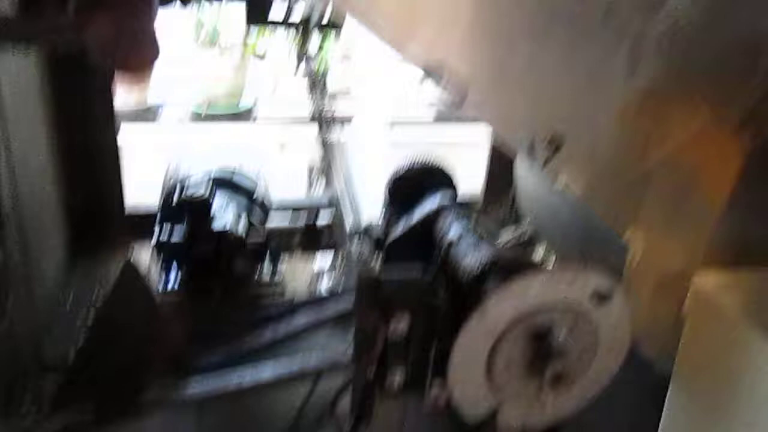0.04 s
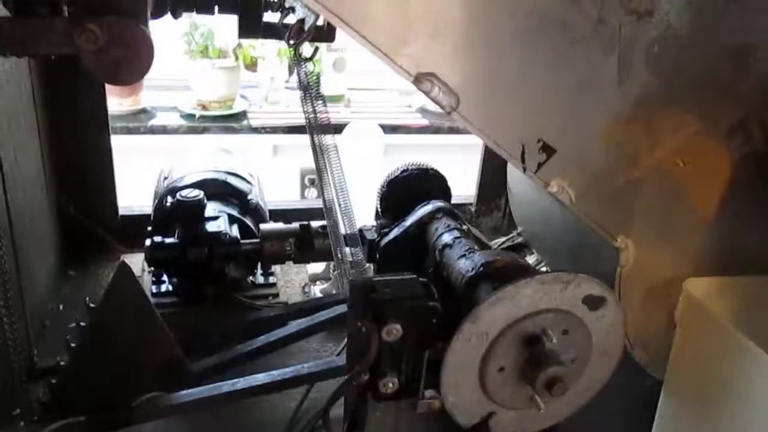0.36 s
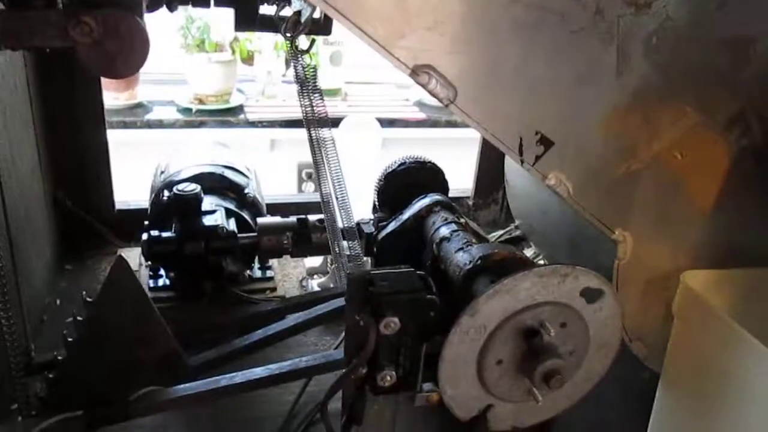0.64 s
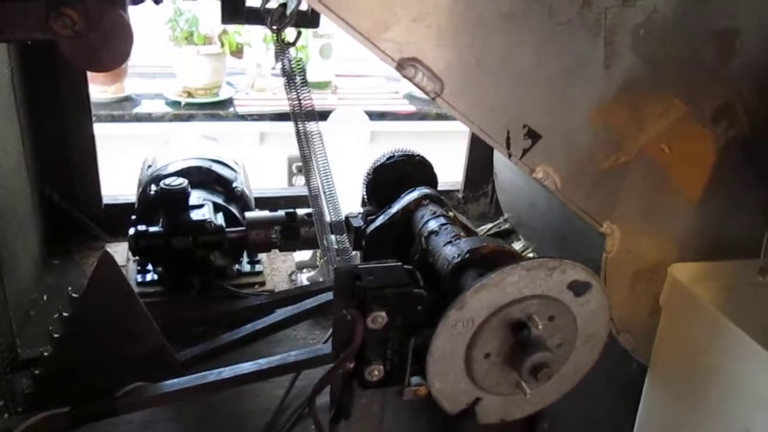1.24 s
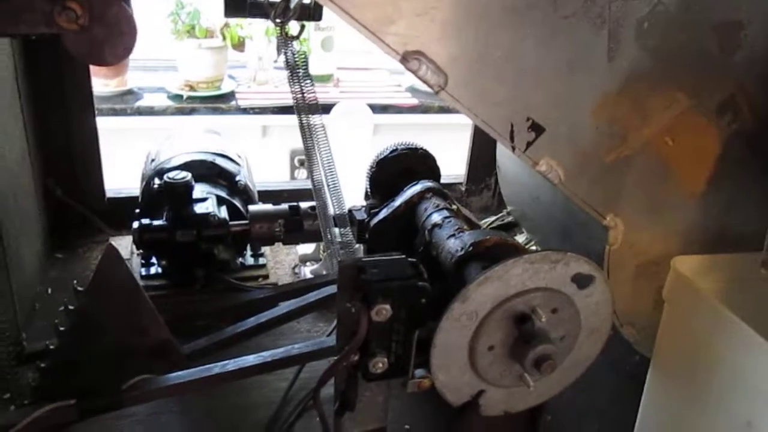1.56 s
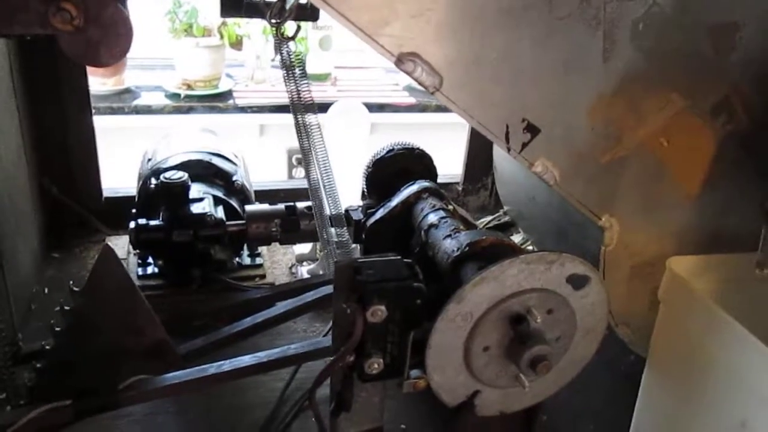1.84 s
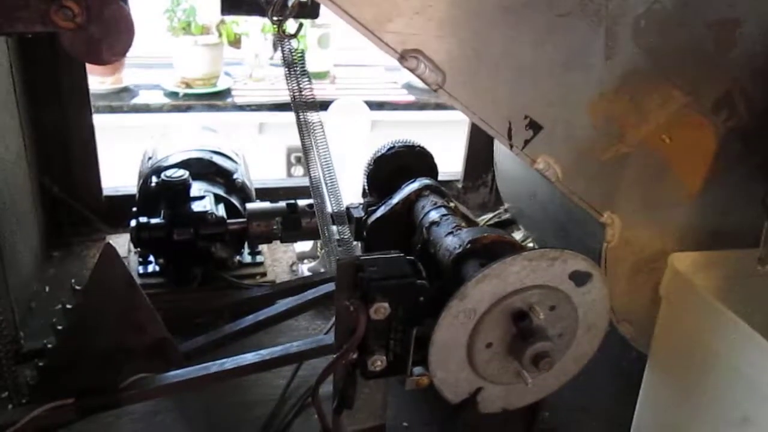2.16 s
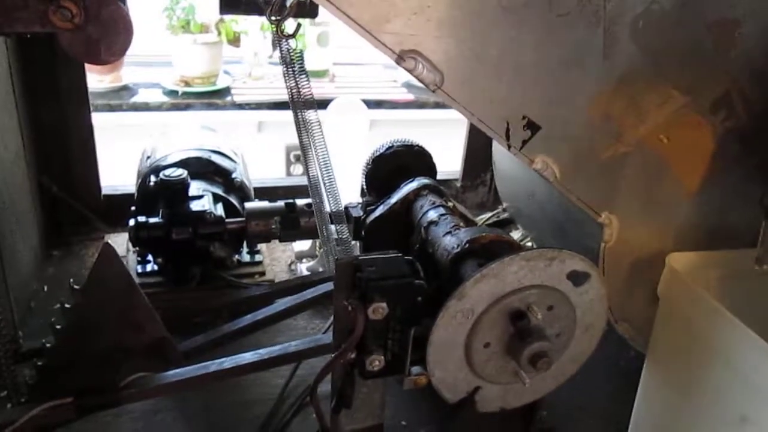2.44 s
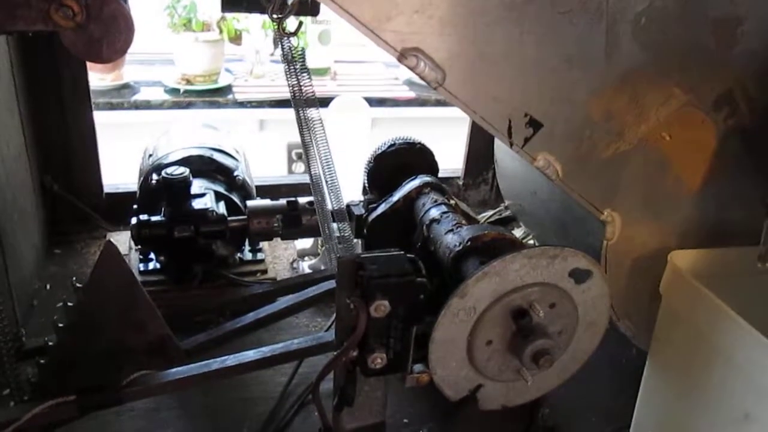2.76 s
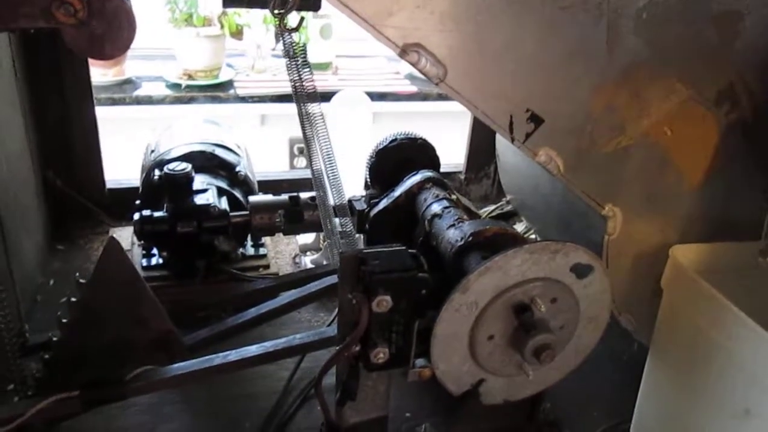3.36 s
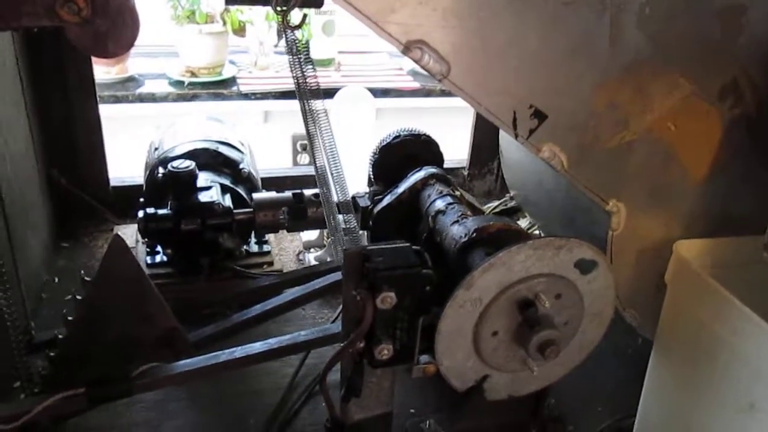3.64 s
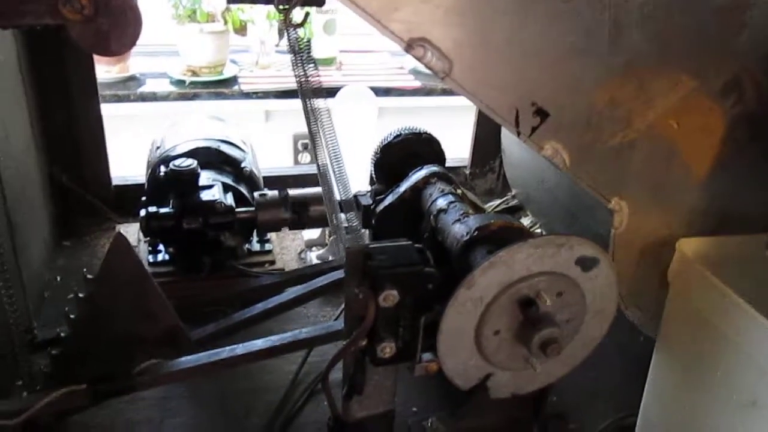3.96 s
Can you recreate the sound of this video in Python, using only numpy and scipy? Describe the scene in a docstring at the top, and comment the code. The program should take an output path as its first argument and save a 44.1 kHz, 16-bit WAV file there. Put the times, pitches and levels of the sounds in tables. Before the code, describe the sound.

A coin-operated mechanism trips with a sharp steel clack and its small motor starts up.

```python
"""Inside the cabinet of an old coin-operated machine, the microphone comes on in a faintly humming room.
A hand rubs, faint clicks sound, and the grip crackles as the microphone's case is bumped.
A coin then rolls down its chute and nudges the trip lever, which chatters in its resonances.
The lever lets go with a sharp steel clack while the linkage knocks on the cabinet. Last, a geared
motor winds up, whining, groaning and forcing the resonances of its housing."""
import sys
import numpy as np
from scipy import signal
from scipy.fft import rfft, irfft
from scipy.io import wavfile

SR = 44100
rng = np.random.default_rng(int(sys.argv[2]) if len(sys.argv) > 2 else 0)


def unload_wav(signal):
    """Save mono or channel-first audio to the path in sys.argv[1] as 16-bit WAV at rate SR, clipped to [-1, 1]."""
    wavfile.write(
        sys.argv[1],
        SR,
        np.round(np.clip(np.atleast_2d(signal).T, -1, 1) * 32767).astype(np.int16),
    )


N = 176400
T = np.arange(N) / SR
CLACK_S = 3.6942   # the lever snaps over


def from_db(db):
    """Amplitude ratio of a level: a factor of ten per 20 dB."""
    return 10 ** (np.asarray(db) / 20)


def rms_one(x):
    """Normalisation to unit rms."""
    return x / np.sqrt(np.mean(x ** 2) + 1e-20)


def in_time(rows):
    """Linear interpolation between (t/s, value) points."""
    return np.interp(T, *np.transpose(rows))


def noise(colour):
    """Spectral shaping: unit-rms noise with a (f/Hz, level/dB) spectrum."""
    hz, db = np.transpose(colour)
    f = np.maximum(np.arange(N // 2 + 1) * SR / N, 1)
    gain = from_db(np.interp(np.log(f), np.log(hz), db))
    return rms_one(irfft(rfft(rng.standard_normal(N)) * gain, N))


def drift(corner_hz):
    """Random fluctuation: low-passed noise of unit rms."""
    f = np.arange(N // 2 + 1) * SR / N
    return rms_one(irfft(rfft(rng.standard_normal(N)) / (1 + (f / corner_hz) ** 2), N))


def decay(s, t60):
    """Exponential decay from 1 at time s, falling 60 dB in t60 seconds."""
    return (T >= s) * from_db(-60 * np.maximum(T - s, 0) / t60)


def ring(impulses, hz, t60):
    """Damped oscillator: a unit impulse starts a decaying sine of amplitude 1."""
    r, w = from_db(-60 / (t60 * SR)), 2 * np.pi * hz / SR
    return signal.lfilter([0, np.sin(w)], [1, -2 * r * np.cos(w), r * r], impulses + 1e-18)


def strike(hits, modes, spread_db):
    """Modal superposition: each blow (t/s, level/dB) excites each mode with a random strength."""
    s, db = np.transpose(hits)
    chance, out = rng.standard_normal((len(s), len(modes))), 0
    for k, (hz, mode_db, t60) in enumerate(modes):
        impulses = np.zeros(N)
        impulses[(s * SR).astype(int)] = from_db(db + mode_db + spread_db * chance[:, k])
        out = out + (-1) ** k * ring(impulses, hz, t60)
    return out


def resonate(x, peaks):
    """Forced response of parallel resonators (f/Hz, bandwidth/Hz, level/dB)."""
    out = 0
    for k, (hz, width, db) in enumerate(peaks):
        r = np.exp(-np.pi * width / SR)
        poles = [1, -2 * r * np.cos(2 * np.pi * hz / SR), r * r]
        out = out + (-1) ** k * from_db(db) * (1 - r * r) / 2 * signal.lfilter([1, 0, -1], poles, x)
    return out


def room():
    """Background noise: a continuous spectrum of rumble and hiss under the lines of mains hum."""
    # rumble and hiss (f/Hz, relative level/dB)
    spectrum = [(20, -4.5), (55, 1), (88, -10), (125, -3.5), (200, -8), (300, -12.5), (420, -14),
                (1000, -19.5), (2000, -26), (4500, -31.5), (10000, -40), (15500, -48)]
    # hum lines (f/Hz, rms level/dB)
    lines = [(120, -60), (240, -66), (360, -68), (480, -70.5), (3090, -82)]
    background = from_db(-52) * noise(spectrum)
    hum = sum(from_db(db) * np.sin(2 * np.pi * hz * T + 0.3 * drift(12)) for hz, db in lines)
    return background + np.sqrt(2) * hum


def hand():
    """Friction noise: a hand rubs in grainy strokes, then its grip crackles in decaying bursts."""
    # friction of the grip (f/Hz, relative level/dB)
    spectrum = [(200, 9), (1000, -6.5), (2000, 1.5), (3000, 4), (7000, -6), (11000, -6.5), (15500, -31)]
    # strokes (t/s, duration/s, level/dB, f/Hz, bandwidth/Hz, relative hiss/dB, grain spread/dB)
    rubs = [(0.51, .1, -59, 2340, 420, -3.5, 4), (0.734, 0.18, -72, 5000, 3000, -0.5, 6.5),
            (0.818, 0.04, -70.5, 5000, 4000, 4, 5), (.905, 0.071, -61, 5500, 3000, -5, 7),
            (0.988, 0.11, -71.5, 12000, 2500, 8, 2)]
    # bursts of the grip (t/s, level/dB, t60/s)
    crackles = [(0.9389, -39.5, 0.0089), (0.947, -39, 0.022), (.9518, -33.5, 0.0091), (0.957, -42.5, 0.035),
                (0.9658, -35, .012), (.9688, -35, 0.007), (0.974, -40, 0.037), (.988, -32, 0.023),
                (.9925, -31.5, 0.0057)]
    grip = noise(spectrum)
    out = grip * sum(from_db(db) * decay(s, t60) for s, db, t60 in crackles)
    for s, length, db, hz, width, hiss_db, grain_db in rubs:
        progress = np.clip((T - s) / length, 0, 1)
        stroke = np.sqrt(np.clip(np.sin(np.pi * progress), 0, 1))
        rub = rms_one(resonate(rng.standard_normal(N), [(hz, width, 0)])) + from_db(hiss_db) * grip
        out = out + stroke * from_db(db + grain_db * drift(120)) * rub
    return out


def clicks():
    """Impulse response: faint clicks ring in heavily damped modes."""
    # impulses (t/s, level/dB)
    hits = [(.6285, -41), (.6312, -47.5), (1.3135, -48)]
    # their ringing (f/Hz, relative level/dB, t60/s)
    modes = [(435, -4, 0.066), (950, -4, .025), (1470, -1, 0.016), (1660, -1.5, 0.023),
             (2030, -1.5, 0.0085), (2650, -5, .012), (3300, -9, 0.01)]
    return strike(hits, modes, spread_db=4.5)


def bump():
    """Structure-borne sound: each blow on the microphone's case is one damped sine."""
    # blows (t/s, level/dB, f/Hz, t60/s)
    blows = [(0.9693, -15.5, 370, 0.014), (0.9734, -14, 165, 0.022)]
    return sum(from_db(db) * decay(s, t60) * np.sin(2 * np.pi * hz * (T - s))
               for s, db, hz, t60 in blows)


def coin():
    """Rolling noise: the coin's uneven contact drives the chute's resonances."""
    # course of the roll (t/s, level/dB)
    roll = [(2.4, -88), (2.75, -65), (3.1, -76), (3.35, -58), (3.62, -63), (3.68, -46.5)]
    # chute resonances (f/Hz, bandwidth/Hz, relative level/dB)
    chute = [(767, 51, 11.5), (1030, 37, 8.5), (4950, 870, -16)]
    rolling = (T > roll[0][0]) * (T < CLACK_S)
    level = from_db(in_time(roll) + 2 * drift(25))
    return rolling * level * rms_one(resonate(rng.standard_normal(N), chute))


def lever():
    """Contact chatter: each touch on the trip lever is a decaying burst of resonant and broad noise."""
    # touches (t/s, level/dB, t60/s, relative level of broad noise/dB)
    touches = [(3.52, -62.5, 0.033, 0.5), (3.635, -48, 0.046, -1), (3.647, -45.5, 0.038, -1),
               (3.6689, -25.5, 0.02, -3), (3.671, -21.5, 0.034, -10), (3.6907, -25, 0.016, -5),
               (3.833, -41, 0.12, 5)]
    # lever resonances (f/Hz, bandwidth/Hz, relative level/dB)
    peaks = [(2500, 200, -9.5), (5580, 240, 1), (6990, 130, 4), (9170, 640, -7.5)]
    # broad chatter (f/Hz, relative level/dB)
    spectrum = [(100, -11), (400, -1), (1500, -3), (4000, 2.5), (10000, -0.5), (15500, -16)]
    ringing = rms_one(resonate(rng.standard_normal(N), peaks))
    broad = noise(spectrum)
    return sum(from_db(db) * decay(s, t60) * (ringing + from_db(broad_db) * broad)
               for s, db, t60, broad_db in touches)


def cabinet():
    """Free vibration: the cabinet rings in its normal modes after each knock of the linkage."""
    # knocks (t/s, level/dB)
    knocks = [(3.672, -32), (3.698, -31), (3.7045, -24.5), (3.7098, -23.5)]
    # cabinet modes (f/Hz, relative level/dB, t60/s)
    modes = [(185, -17.5, 0.23), (378, -2, 0.24), (494, 3, 0.054), (685, -2.5, 0.033), (742, -11, 0.091),
             (910, 3, 0.059), (1107, -6, 0.045), (1444, -9, 0.092), (1568, -3, 0.13), (1656, -3.5, 0.045),
             (1824, -7, 0.1), (2354, -7, 0.12)]
    return strike(knocks, modes, spread_db=2.5)


def clack():
    """Hard impact: the steel lever rings with a broadband crack, and the linkage's rattle dies away."""
    # the lever's short-lived modes and its faint lasting ones (f/Hz, relative level/dB, t60/s)
    short_modes = [(2060, -6, .012), (3140, 7.5, 0.01), (4350, -2.5, 0.013), (4820, -5, 0.011),
                   (5500, -2.5, 0.0093), (6890, -16, 0.028), (8300, -13, .01), (9440, -14, 0.012),
                   (12220, -18, .009), (13800, -6, 0.0081)]
    lasting_modes = [(3070, -36, 0.32), (3500, -50, .3), (5680, -44, 0.26), (6800, -42, 0.52),
                     (8500, -34, 0.18), (9400, -47, 0.17)]
    # spectra of the crack and the rattle (f/Hz, relative level/dB)
    crack_spectrum = [(100, -24), (1200, -9), (2400, -9), (5000, 2), (10000, 0), (15500, -10)]
    rattle_spectrum = [(60, -19), (300, -15), (1000, -2), (1500, -1), (2000, 3.5), (2700, -4.5),
                       (4800, 1.5), (7000, -7.5), (11000, -10), (15500, -24)]
    snap = strike([(CLACK_S, -3.5)], short_modes + lasting_modes, spread_db=3.5)
    crack = from_db(-12) * decay(CLACK_S, t60=0.017) * noise(crack_spectrum)
    early = from_db(-16.5) * decay(CLACK_S, t60=0.073)
    tail = from_db(-35) * decay(CLACK_S, t60=0.33)
    return snap + crack + (early + tail) * noise(rattle_spectrum)


def gear_tone(curve, partials):
    """Modulation: a jittering tone on a (t/s, f/Hz, level/dB) curve wobbles once per shaft turn."""
    jitter, flutter_db, shaft_hz, wobble_depth = 0.01304, 1.0, 66.2, 0.39
    s, hz, db = np.transpose(curve)
    pitch = np.interp(T, s, hz) * (1 + jitter * drift(57.4))
    phase = 2 * np.pi * np.cumsum(pitch) / SR
    level = from_db(np.interp(T, s, db) + flutter_db * drift(60)) * (T >= s[0])
    wobble = 1 + wobble_depth * np.sin(2 * np.pi * shaft_hz * T + drift(9.9))
    tone = sum(from_db(partial_db) * np.sin(ratio * phase) for ratio, partial_db in partials)
    return np.sqrt(2) * level * wobble * tone


def motor():
    """Forced vibration: gear tones, grinding and whirr pulse with the torque ripple over a low groan."""
    # the gears whine as they take up the load (t/s, f/Hz, level/dB)
    whine = [(3.725, 1088, -46), (3.745, 1087, -33), (3.78, 1099, -28.5), (3.805, 1115, -41),
             (3.825, 1096, -27.5), (3.85, 1061, -31.5), (3.873, 1093, -16), (3.892, 1117, -22),
             (3.902, 1102, -24), (3.912, 1110, -26), (3.94, 1200, -43), (4.0, 1313, -54)]
    # partials of the whine (frequency ratio, relative level/dB)
    partials = [(0.483, -12), (1, 0)]
    # a second tone climbs as the motor gathers speed (t/s, nominal f/Hz, level/dB)
    climb = [(3.885, 735, -60), (3.912, 754, -27), (3.94, 761, -36), (3.97, 791, -26.5), (4.0, 860, -28)]
    # the motor's groan sags under the load (t/s, f/Hz, level/dB)
    groan = [(3.73, 190, -41), (3.765, 186.7, -37), (3.80, 141, -43), (3.84, 129.5, -43.5),
             (3.89, 131, -48), (3.925, 133, -61), (3.975, 130, -42), (4.0, 130, -56)]
    # course of the grinding (t/s, level/dB)
    grind_levels = [(3.72, -27), (3.79, -33), (3.835, -29), (3.88, -32.5), (3.925, -24.5), (3.95, -31),
                    (4.0, -28.5)]
    # spectra of the whirr and of the noise that drives the housing (f/Hz, relative level/dB)
    whirr_spectrum = [(30, -50), (85, -38), (130, -7), (200, -3.5), (280, -10.5), (480, -0.5), (1200, 2),
                      (1550, -10.5), (3000, -14), (5000, -26), (10000, -26), (15500, -40)]
    rough_spectrum = [(200, -12), (500, 7), (1300, 3.5), (2500, -15), (8000, -40)]
    # resonances of the housing, low and treble (f/Hz, bandwidth/Hz, relative level/dB)
    housing = [(447, 25, -15), (512.3, 32, -1.5), (576, 39, -5.5), (670, 52, -26), (890, 80, -4.5),
               (946, 65, -5), (1018, 32, 1), (1147, 61, 0.5), (1310, 68, -3.5)]
    housing_treble = [(2380, 42, 3), (2850, 74, 1), (3100, 44, -7), (3610, 120, 4.5), (4620, 310, 2),
                      (5240, 190, -4), (7000, 140, -16), (8900, 300, -16)]
    start_s, fade_in_s, rise_db_per_s = 3.715, 0.036, 29
    ripple_hz, ripple_depth = 119.4, 0.13
    running = np.clip((T - start_s) / fade_in_s, 0, 1)
    gears = gear_tone(whine, partials) + gear_tone(climb, partials=[(0.97, 0)])
    grind = from_db(in_time(grind_levels)) * rms_one(resonate(noise(rough_spectrum), housing))
    whirr = from_db(-33.5) * noise(whirr_spectrum)
    swell = from_db(-55.5 + rise_db_per_s * (T - start_s))   # brighter as it speeds up
    bright = swell * rms_one(resonate(rng.standard_normal(N), housing_treble))
    ripple = 1 + ripple_depth * np.sin(2 * np.pi * ripple_hz * T)
    return running * ((gears + grind + whirr + bright) * ripple + gear_tone(groan, partials=[(1, 0)]))


def scene():
    """Superposition: all sources add at one point inside the cabinet."""
    return (room() + clicks() + hand() + bump() + coin() + lever() + clack() + cabinet() + motor())[None]


def record(dry):
    """Filtering and clipping: the microphone comes on, notches two bands, limits peaks, cuts the top."""
    on_s, overload, cutoff_hz = 0.243, 0.85, 15800
    # narrow dips in the microphone's response (f/Hz, bandwidth/Hz)
    dips = [(3930, 246), (7870, 190)]
    x = dry * (T >= on_s)
    for hz, width in dips:
        x = signal.lfilter(*signal.iirnotch(hz, hz / width, fs=SR), x)
    x = np.clip(x, -overload, overload)
    return signal.sosfilt(signal.ellip(10, .1, 70, cutoff_hz, fs=SR, output="sos"), x)


dry = scene()
out = record(dry)
unload_wav(out)
```